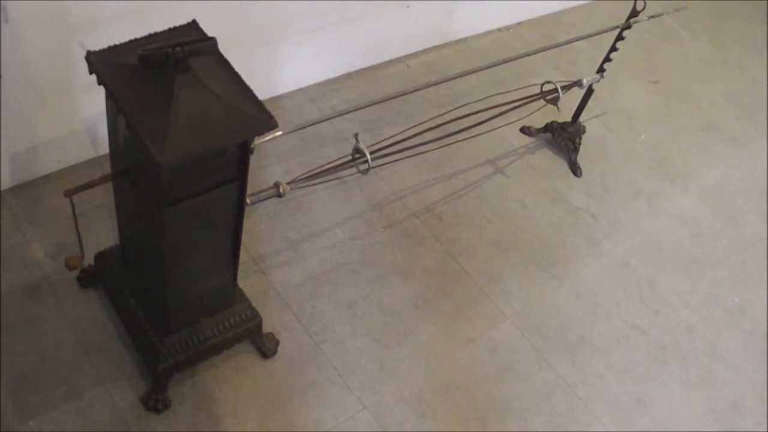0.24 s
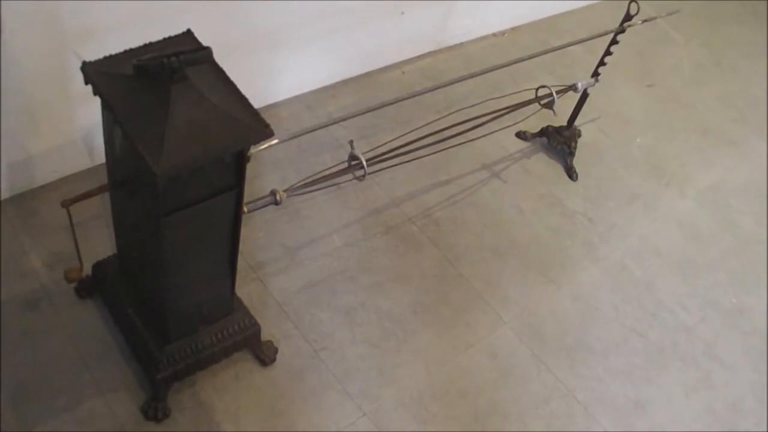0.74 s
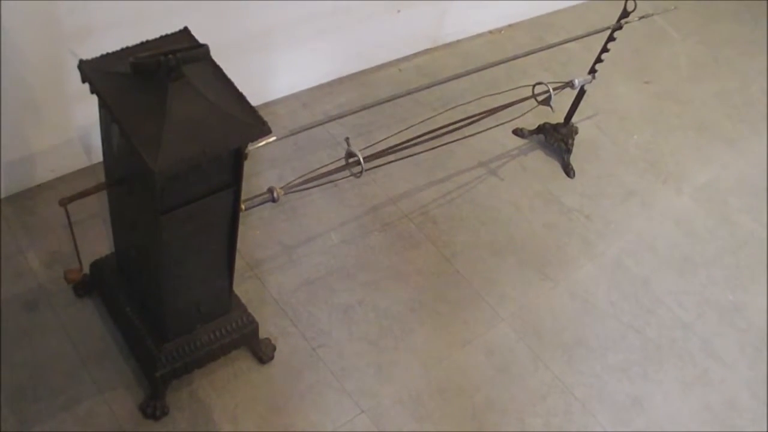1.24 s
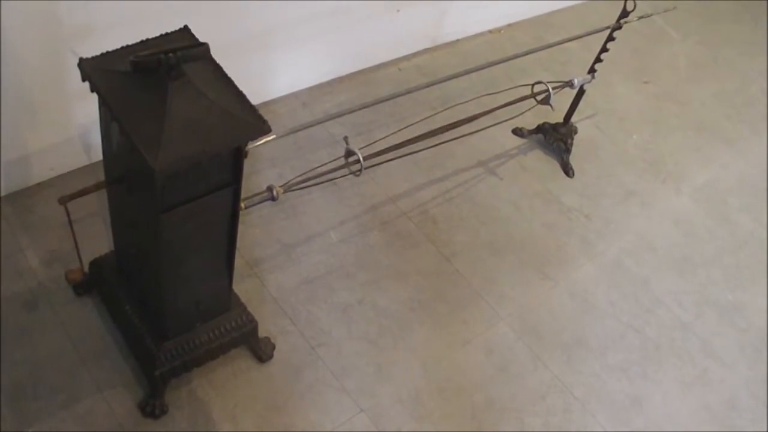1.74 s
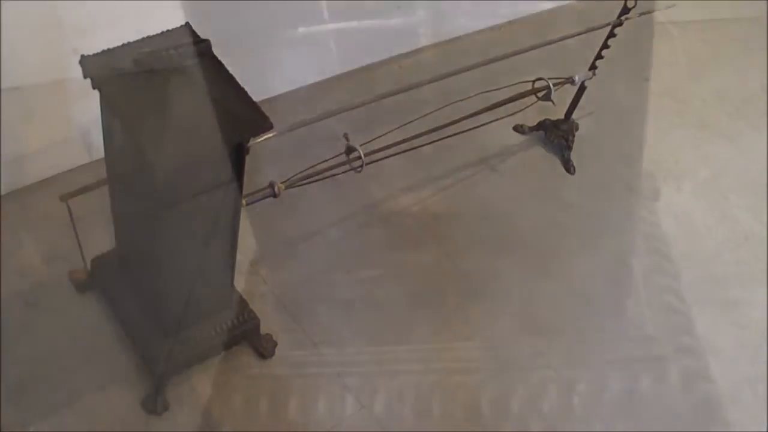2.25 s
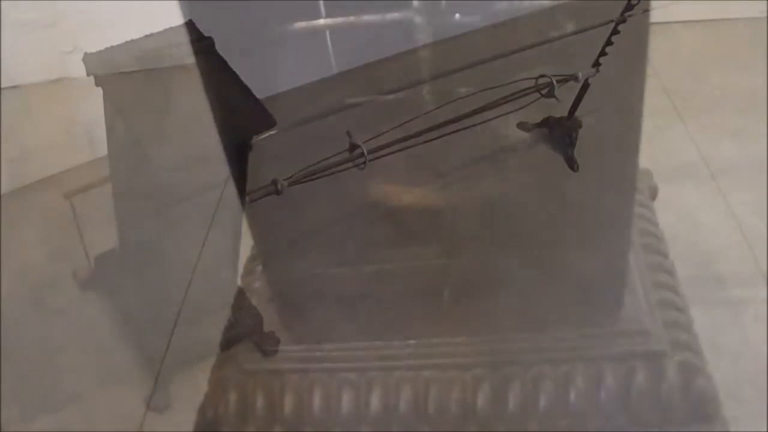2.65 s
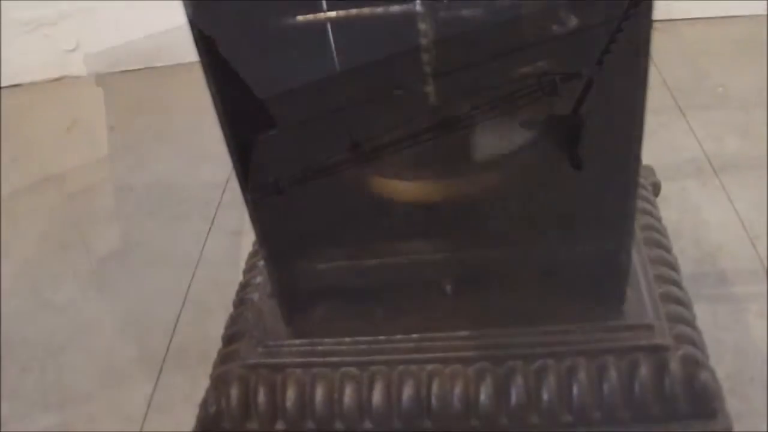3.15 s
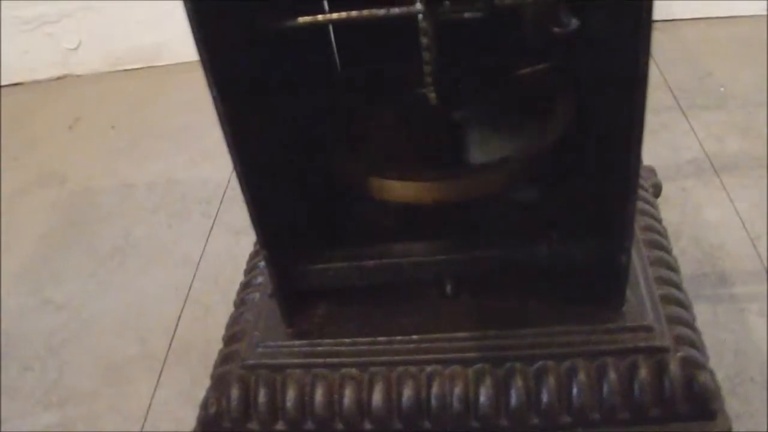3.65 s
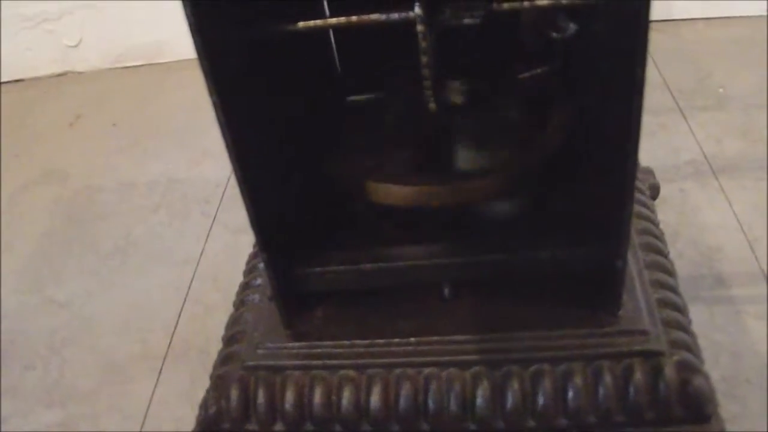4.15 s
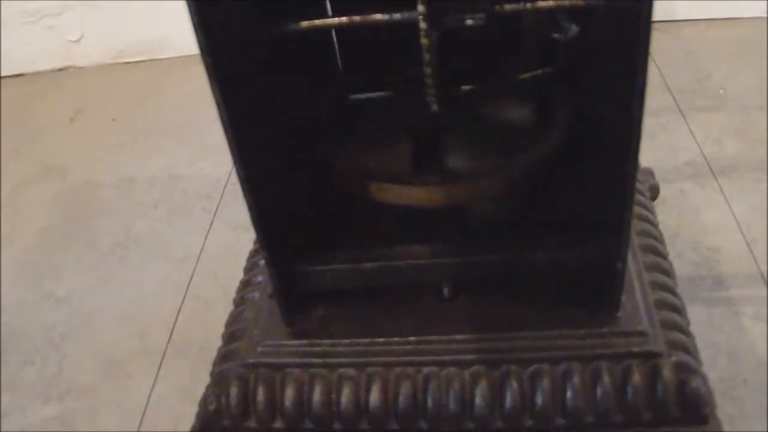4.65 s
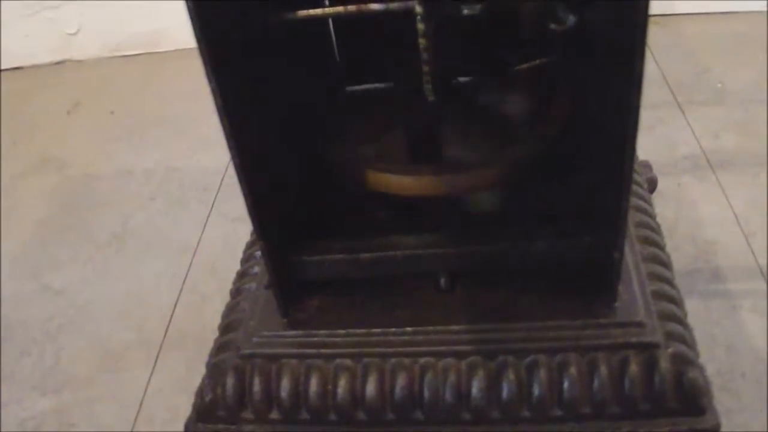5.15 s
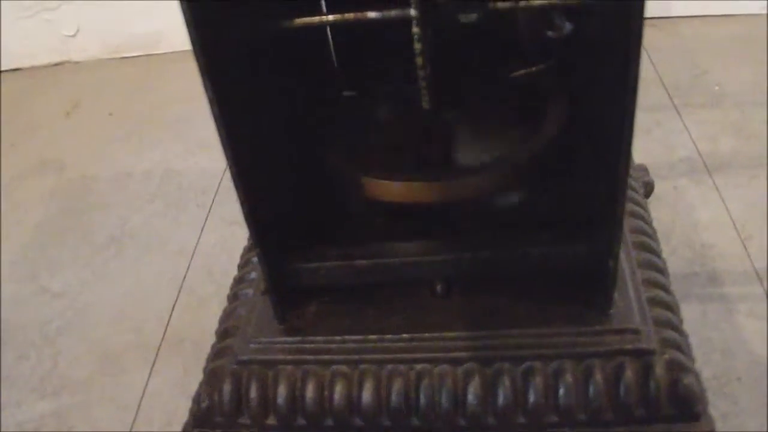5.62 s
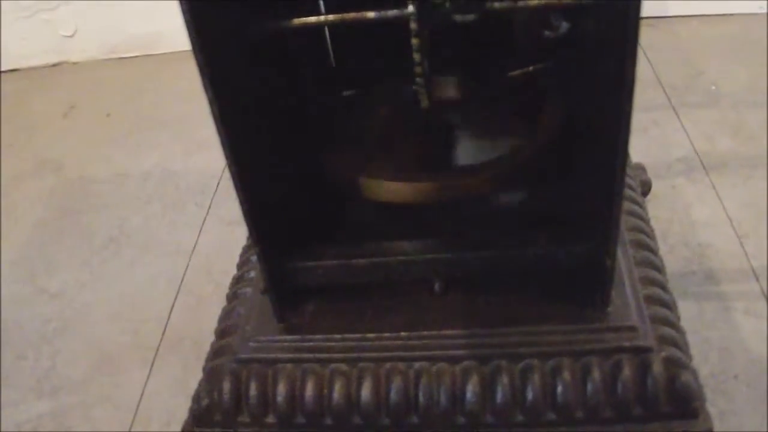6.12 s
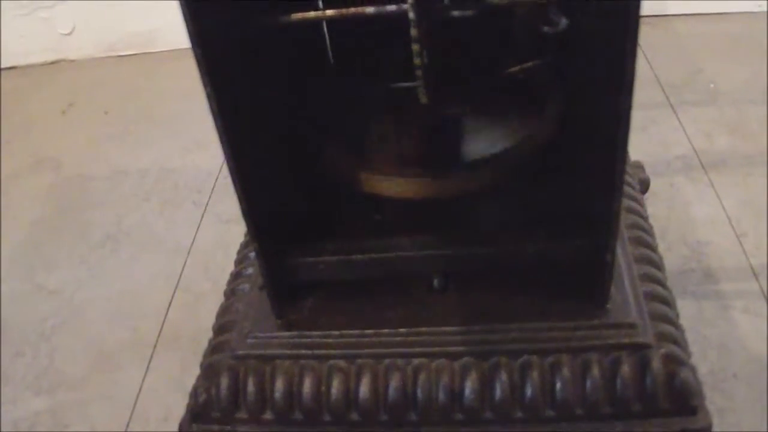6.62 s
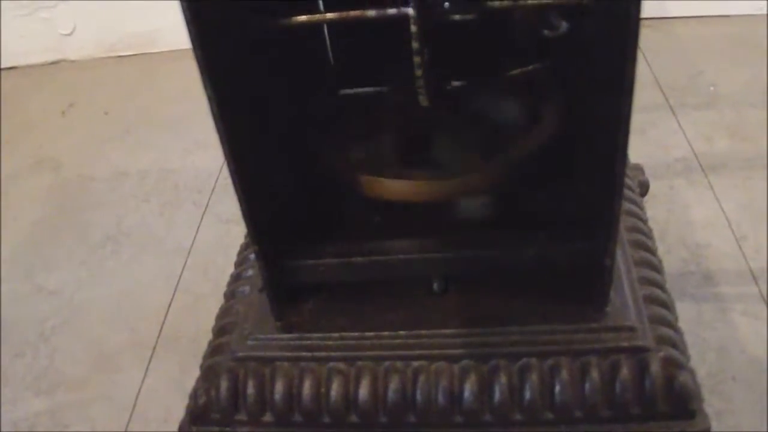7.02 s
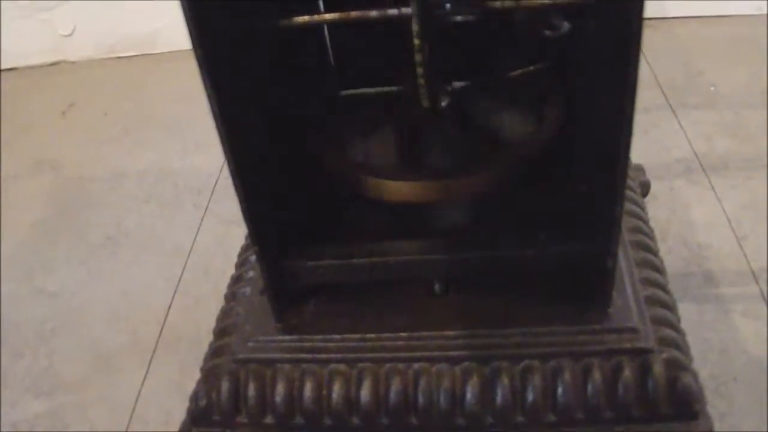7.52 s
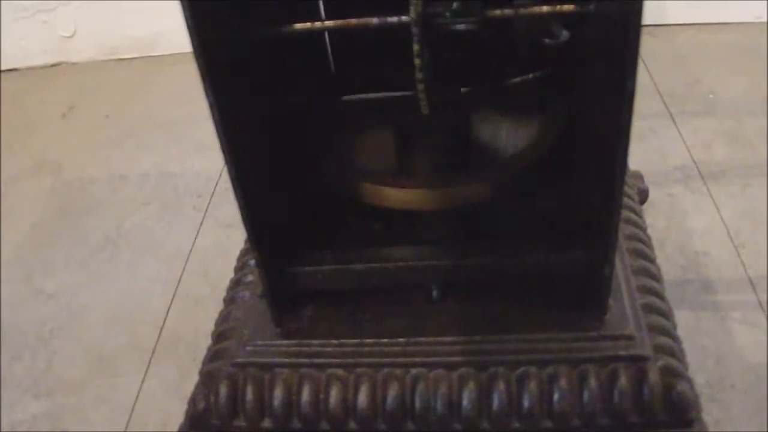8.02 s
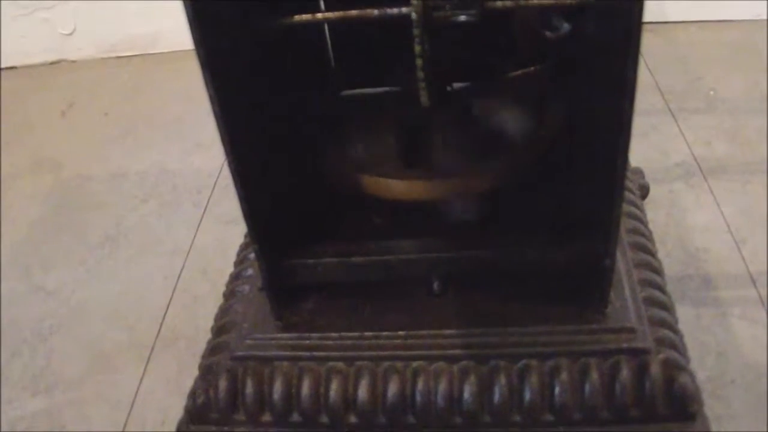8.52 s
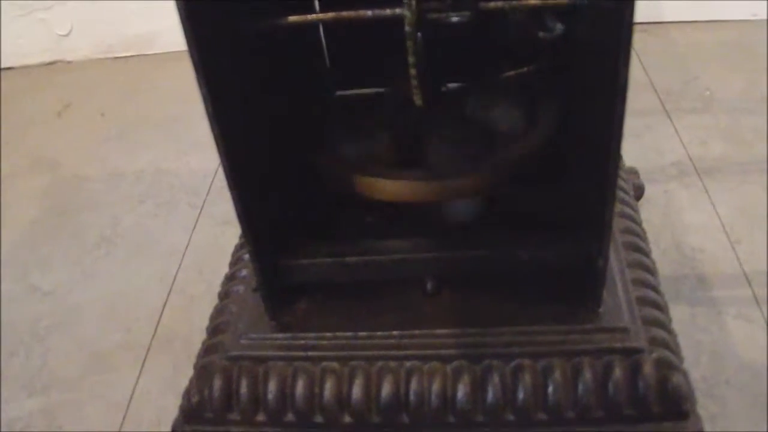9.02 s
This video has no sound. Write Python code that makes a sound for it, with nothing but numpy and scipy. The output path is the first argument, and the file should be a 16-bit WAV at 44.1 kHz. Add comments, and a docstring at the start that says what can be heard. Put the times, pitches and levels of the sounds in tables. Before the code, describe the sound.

An old geared mechanism whirs softly inside a metal case in a quiet room. Heard from across the floor, irregular metallic ticks and faint rustling scrapes ride over it, with a few soft hollow bumps. A closer view fades in underneath; after one hard snap the ticking ends and the near, slightly wider whir runs on steadily, with one dull knock.

```python
"""A small motor mechanism whirs in its case: chance tooth contacts ring the case resonances.
It is heard first from across the floor in mono, then close up by a pair of microphone ports;
the two views overlap for a while. Room rumble, hiss, wavering hums and a thin whine lie under both.
In the far view a pawl ticks and rustles as ringing scrapes, and soft bumps swell the case.
Struck modes make one hard snap and, later, a dull hollow knock."""
import sys
import numpy as np
from scipy import signal
from scipy.fft import rfft, irfft, next_fast_len
from scipy.io import wavfile

SR = 44100
rng = np.random.default_rng(int(sys.argv[2]) if len(sys.argv) > 2 else 0)


def to_wav(sig):
    """Store sig (one row per channel, or 1-D mono) as 16-bit WAV at the path in sys.argv[1].

    Samples outside -1..1 are clipped; the rate is SR.
    """
    pcm = np.clip(np.atleast_2d(sig), -1, 1) * 32767
    pcm = np.round(pcm).astype(np.int16)
    wavfile.write(sys.argv[1], SR, pcm.T)  # frames by channels


N = 408807
SIZE = next_fast_len(N, True)
HZ, TIME = np.fft.rfftfreq(SIZE, 1 / SR), np.arange(N) / SR

# The two microphone views: start, end and fade in seconds. View 0 is far, view 1 is near.
FAR, NEAR = (-1, 3.465, 0.027), (1.98, 11, 0.023)
# Resonances of frame and case. Each row: frequency in Hz, width in Hz, relative far and near level in dB.
CASE = [(626, 84, -6, -24.5), (997, 101, -11, -13.5), (1104, 40, -10.5, -12.5), (1236, 80, -8, -7),
        (1390, 150, -9, -11.5), (1637, 127, -5.5, -7), (1776, 104, -3.5, -5.5), (1897, 91, -0.5, 0),
        (2080, 160, -23.5, -20), (2410, 250, -11, -15), (2599, 178, -3, -3.5), (2987, 120, -6.5, -9.5),
        (3270, 245, -9.5, -11.5), (3670, 310, -10, -11.5), (3947, 139, -6.5, -10), (4250, 84, -22, -19.5),
        (4480, 170, -20.5, -40), (4790, 106, -19, -23), (5470, 310, -20.5, -21), (6150, 600, -18, -17),
        (6550, 400, -20, -20), (7290, 370, -24, -25.5), (7780, 430, -21, -22.5), (8430, 320, -20.5, -25),
        (8970, 400, -26, -25.5), (9840, 580, -22, -27.5)]
# Modes of the pawl. Each row: frequency in Hz, relative level in dB, time to fall 60 dB in seconds.
PAWL = [(1120, -6.5, 0.012), (1560, -2.5, 0.0089), (1900, -0.5, 0.011), (2543, -2.5, 0.014),
        (3060, -1, 0.0095), (3370, 4.5, 0.0098), (3580, 4, 0.009), (4100, -4, 0.01)]


def gain_of(db):
    """Decibels to gain."""
    return 10 ** (np.asarray(db) / 20)


def evened(x):
    """Scales to rms 1."""
    return x / np.sqrt(np.mean(x ** 2) + 1e-20)


def read(hz_points, values, hz):
    """Straight lines on a log-frequency axis."""
    return np.interp(np.log(hz + 1), np.log(np.asarray(hz_points) + 1), values)


def coloured(x, gain):
    """Filters x by a gain given at the frequencies HZ."""
    return irfft(rfft(x, SIZE) * gain, SIZE)[:N]


def wander(per_s):
    """Slow chance of rms 1, fading out above about per_s swings a second."""
    hz = HZ[:4000]
    seeds = rng.standard_normal((2, len(hz)))
    spectrum = (seeds[0] + 1j * seeds[1]) / (1 + (hz / per_s) ** 4)
    return evened(irfft(spectrum, SIZE)[:N])


def ring(modes, length):
    """Dying sines of a struck thing, for length seconds."""
    t = np.arange(round(length * SR)) / SR
    return sum(gain_of(db - 60 * t / t60) * np.sin(2 * np.pi * hz * t) for hz, db, t60 in modes)


def scrape(noise, modes, length):
    """A ragged contact, falling 20 dB in length seconds, rings the modes; peak 1."""
    t = np.arange(len(noise)) / SR
    blow = noise * (1 - np.exp(-t / 0.00035)) * gain_of(-20 * t / length)
    rung = ring(modes, .03)
    onset = (1 - np.exp(-TIME[:len(rung)] / 0.00032)) ** 2
    sound = np.convolve(blow, rung * onset)
    return sound / abs(sound).max()


def add(mix, s, sound):
    """Lays a sound into the mix at s seconds."""
    part = mix[round(s * SR):][:len(sound)]
    part += sound[:len(part)]


def gate(start, end, fade):
    """Open from start to end, with short fades."""
    return np.clip((TIME - start) / fade, 0, 1) * np.clip((end - TIME) / fade, 0, 1)


def air(view):
    """Rumble and hiss of the room: noise coloured by the room's spectrum."""
    # Each row: frequency in Hz, relative far and near level in dB per Hz.
    room_spectrum = [(15, -10, -6.5), (28.6, -0.5, -3), (41, -12, -5.5), (96.5, -16.5, -10.5),
                     (161, -21.5, -16.5), (202, -11.5, -14.5), (305, -13.5, -18), (338, -21.5, -18.5),
                     (535, -18, -20.5), (890, -22.5, -18.5), (3000, -41, -25), (10100, -32.5, -30.5),
                     (12900, -37, -35), (16000, -36.5, -41)]
    level_db = (-53, -54.5)[view]  # rms, far and near
    columns = np.transpose(room_spectrum)
    colour = gain_of(read(columns[0], columns[1 + view], HZ))
    return gain_of(level_db) * evened(coloured(rng.standard_normal(N), colour))


def hums(view):
    """Tones that waver in pitch and level, and the clean steady whine."""
    # Wavering hum tones. Each row: mean frequency in Hz, rms waver in Hz, far and near level in dB.
    hum_table = [(28.8, 2.9, -61, -61), (103, 2.99, -73, -68), (125.6, 4.15, -68, -78.5),
                 (222, 1.37, -66, -67.5), (386, 1.3, -73.5, -79), (433.3, 0.82, -61.5, -80),
                 (524, 1.26, -74, -78.5), (3150, 2.8, -86, -70)]
    # Frequencies of the thin whine lines in Hz.
    whine_hz = (2005.3, 2807.4, 7219.1, 8021.2, 10828.6, 11364)
    # Levels of the same lines. Each row: far and near level in dB.
    whine_levels = [(-70, -75), (-64, -65.5), (-104, -79), (-70, -74), (-88, -91), (-93, -89)]
    low = np.zeros(N)
    for row in hum_table:
        level = gain_of(row[2 + view] + 1.1 * wander(3.7))
        turns = np.cumsum(row[0] + row[1] * wander(5.79)) / SR
        low += level * np.sin(2 * np.pi * turns)
    high = sum(gain_of(row[view]) * np.sin(2 * np.pi * (hz * TIME + rng.random()))
               for hz, row in zip(whine_hz, whine_levels))
    return np.sqrt(2) * (low + high)  # makes the levels rms


def knock():
    """A soft low blow on something hollow rings its low modes."""
    # Each row: frequency in Hz, relative level in dB, time to fall 60 dB in seconds.
    hollow_modes = [(238, -4, .04), (343, -2.5, 0.064), (392, -2.5, 0.073), (470, -2.5, 0.034),
                    (600, -2.5, 0.044), (690, -2, 0.049)]
    start_s, level_db = 5.576, -38
    out = np.zeros(N)
    sound = ring(hollow_modes, .1)
    onset = 1 - np.exp(-TIME[:len(sound)] / 0.00077)
    add(out, start_s, gain_of(level_db) * sound * onset)
    return out


def snap():
    """Strain builds for a moment and lets go; bending waves bring the high modes first."""
    # Each row: frequency in Hz, relative level in dB, time to fall 60 dB in seconds.
    snap_modes = [(580, -30, 0.03), (720, -13, 0.044), (936, -9, 0.041), (1143, 4, 0.025), (1403, 1, 0.032),
                  (1530, 2.5, 0.016), (1766, 4, 0.029), (1957, 4.5, .03), (2520, 3, 0.02),
                  (3180, 2.5, 0.015), (3585, 2.5, 0.011), (4230, -18, 0.013), (4500, -11.5, 0.012),
                  (5500, -20, .006), (6800, -22, .006), (7800, -18, .008), (9000, -15, .006)]
    start_s, level_db, rise_s = 3.3825, -16.5, 0.00081
    hz, db, t60 = np.transpose(snap_modes)
    t = TIME[:3000]
    delayed = t[:, None] - .0033 * np.sqrt(1700 / hz)  # sets each mode's phase by its travel time
    swing = (gain_of(db - 60 * t[:, None] / t60) * np.cos(2 * np.pi * hz * delayed)).sum(1)
    onset = np.sin(np.pi / 2 * np.minimum(t / rise_s, 1)) ** 2
    out = np.zeros(N)
    add(out, start_s, gain_of(level_db) * swing * onset)
    return out


def bumps():
    """Slow nudges swell the lowest resonance of the case."""
    # Each row: start in seconds, level in dB.
    nudges = [(3.004, -33), (3.146, -40), (3.198, -38)]
    rise_s, t60_s = .008, 0.074
    out = np.zeros(N)
    sound = ring([(CASE[0][0], 0, t60_s)], .1)
    onset = np.minimum(TIME[:len(sound)] / rise_s, 1)
    for s, db in nudges:
        add(out, s, gain_of(db) * sound * onset)
    return out


def faint_ticks():
    """The pawl also rustles over the teeth at chance moments."""
    per_s, least_db, spread_db = 30, -43, 1.5  # mean rate, lowest level, dB per unit of chance size
    out = np.zeros(N)
    gaps, sizes = rng.exponential(1, (300, 2)).T
    starts = np.cumsum(gaps) / per_s
    for s, size, noise in zip(starts, sizes, rng.standard_normal((300, 800))):
        level_db = least_db + spread_db * min(size, 3)
        add(out, s, gain_of(level_db) * scrape(noise, PAWL, 0.002))
    return out


def ticks():
    """A dull touch, then the drop: the touch is a softer strike, so its upper modes are weaker."""
    # Each row: drop in seconds, then drop, treble and touch level in dB.
    tick_table = [(.822, -47, -39, -47), (1.0742, -27.5, -43, -30), (1.1725, -29.5, -36, -33),
                  (1.2672, -34, -48, -31), (1.3085, -34, -57, -45), (1.3865, -29, -44, -38),
                  (1.4685, -28, -35.5, -30.5), (1.5699, -28.5, -39, -30), (1.6962, -26.5, -41, -36),
                  (2.154, -26.5, -39, -32), (2.2078, -34, -52, -44), (2.2545, -25, -38.5, -33),
                  (2.3468, -28.5, -37.5, -38), (2.464, -28, -40, -36), (2.932, -29, -35.5, -29.5),
                  (3.034, -27.5, -40, -31), (3.1265, -32, -37, -34), (3.2165, -32.5, -48, -40),
                  (3.2875, -30, -50, -38), (3.330, -30.5, -47, -44), (3.3488, -28, -38, -44)]
    # Treble of the pawl. Each row: frequency in Hz, relative level in dB, time to fall 60 dB in seconds.
    treble_modes = [(7760, -8, 0.0084), (8350, 5, 0.0046), (9230, -13, .008)]
    touch_lead_s = .008
    out = np.zeros(N)
    soft = [(hz, db - 4.0 * np.log2(hz / 1000), t60) for hz, db, t60 in PAWL]
    noises = rng.standard_normal((len(tick_table), 2, 800))
    for (s, db, treble_db, touch_db), (drop_noise, touch_noise) in zip(tick_table, noises):
        treble = gain_of(treble_db) * scrape(drop_noise, treble_modes, 0.0057)
        drop = gain_of(db) * scrape(drop_noise, PAWL, 0.0077)
        touch = gain_of(touch_db) * scrape(touch_noise, soft, 0.0095)
        add(out, s, drop + treble)
        add(out, s - touch_lead_s, touch + 0.34 * treble)
    return out


def whir(view, start, chatter_db, throb_db, surge_db):
    """Dense tooth contacts of uneven strength ring the case resonances."""
    # The whir swells once a turn. Each row, far then near: depth in dB, time of a crest in seconds.
    swell_table = [(.3, 0.2), (.3, 4.61)]
    turn_s = 1.074  # one turn of the slow wheel
    level_db = (-44.5, -44.5)[view]  # at the start of each view, before the swell
    creep_db_per_s = (0.38, 0.13)[view]  # it grows a little
    strength_db = chatter_db * wander(180) + throb_db * wander(35) + surge_db * wander(17.6)
    contacts = rng.standard_normal(N) * gain_of(strength_db)
    modes = np.array(CASE)
    grid = np.linspace(0, SR / 2, 4097)
    off = (grid[:, None] - modes[:, 0]) / modes[:, 1]  # distance from each resonance, in widths
    power = (gain_of(modes[:, 2 + view]) ** 2 / (1 + (1.56 * off) ** 2) ** 2).sum(1)
    body = evened(coloured(contacts, np.interp(HZ, grid, np.sqrt(power))))
    depth_db, crest_s = swell_table[view]
    swell_db = depth_db * np.cos(2 * np.pi * (TIME - crest_s) / turn_s)
    creep_db = creep_db_per_s * (TIME - max(start, 0))
    return body * gain_of(level_db + creep_db + swell_db)


def scene():
    """The far view is mono; close up the left port hears a little later than the right."""
    # Difference of the two ports under their sum. Each row: frequency in Hz, level in dB.
    port_difference = [(60, -70), (200, -56), (380, -41), (700, -30), (1290, -24), (2380, -16), (4400, -10),
                       (8120, -5), (15000, 4)]
    # Sound the ports do not share. Each row: frequency in Hz, level in dB.
    unshared = [(60, -75), (300, -54), (1000, -31), (3000, -20), (6000, -11), (9000, -5.5), (15000, 1)]
    far = whir(0, FAR[0], 0.73, 0.41, 0.93) + air(0) + hums(0)
    far = (far + ticks() + faint_ticks() + bumps()) * gate(*FAR)
    near = (whir(1, NEAR[0], 0.82, 0.32, 0.74) + air(1) + hums(1)) * gate(*NEAR)
    # a delay between ports makes a difference signal a quarter turn behind
    side = coloured(near, -1j * gain_of(read(*np.transpose(port_difference), HZ)))
    # reflections reach each port by its own path: same colour, scattered phase
    scatter = np.exp(2j * np.pi * rng.random(len(HZ)))
    side += coloured(near, scatter * gain_of(read(*np.transpose(unshared), HZ))) * gate(*NEAR)
    middle = far + near + snap() + knock()
    return middle + np.array([side, -side])


def record(dry):
    """The band limit: a steep low-pass."""
    edge_hz = 15750
    lowpass = signal.firwin(511, edge_hz, window=("kaiser", 9), fs=SR)
    return signal.oaconvolve(dry, lowpass[None], "same")


dry = scene()
out = record(dry)
to_wav(out)
```